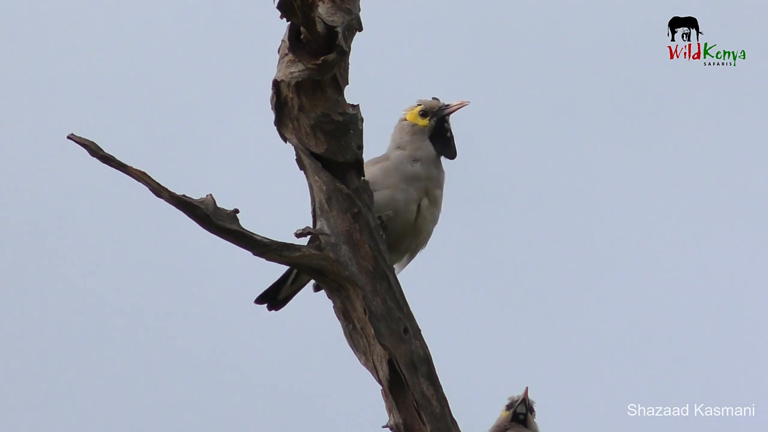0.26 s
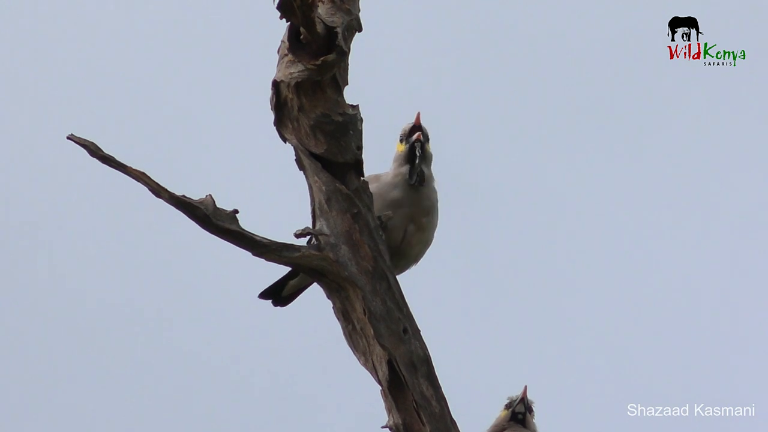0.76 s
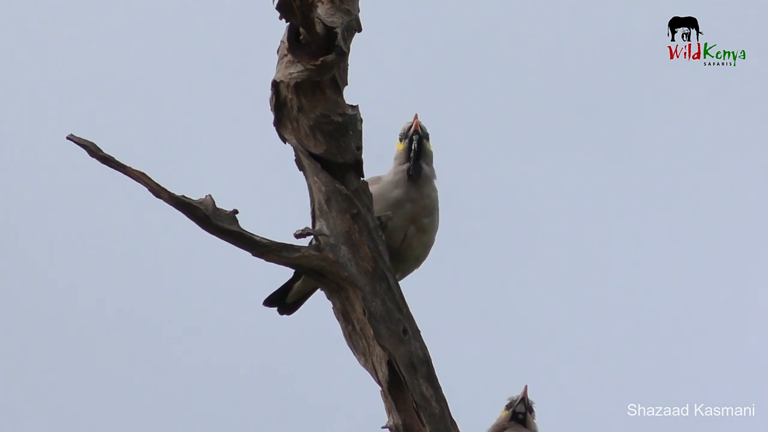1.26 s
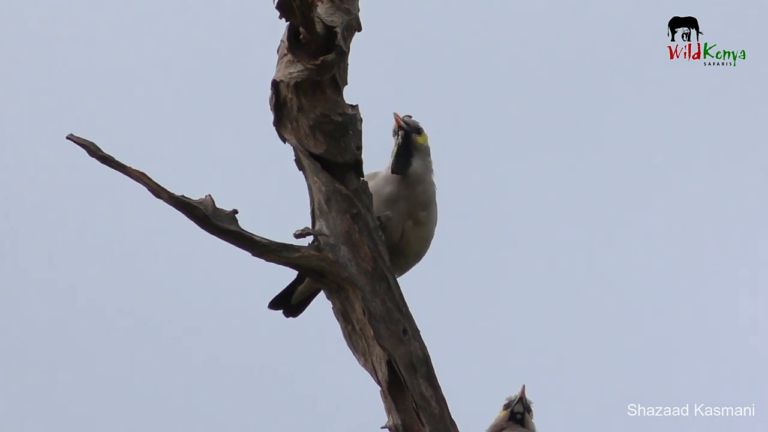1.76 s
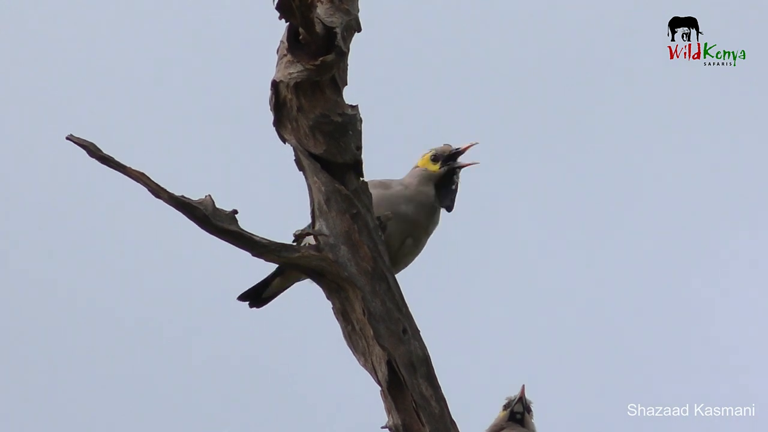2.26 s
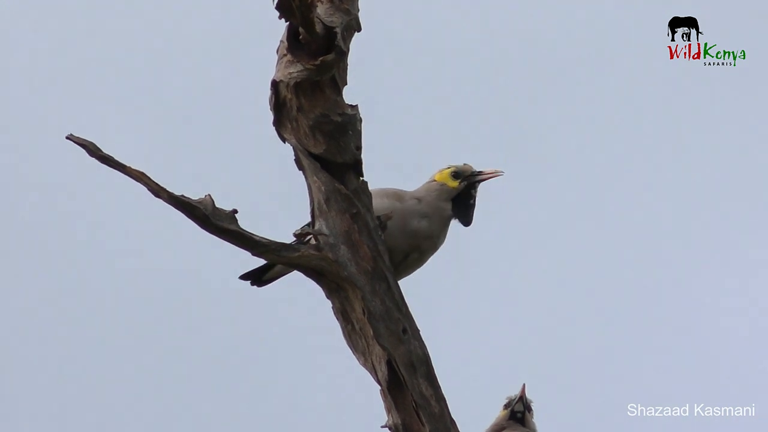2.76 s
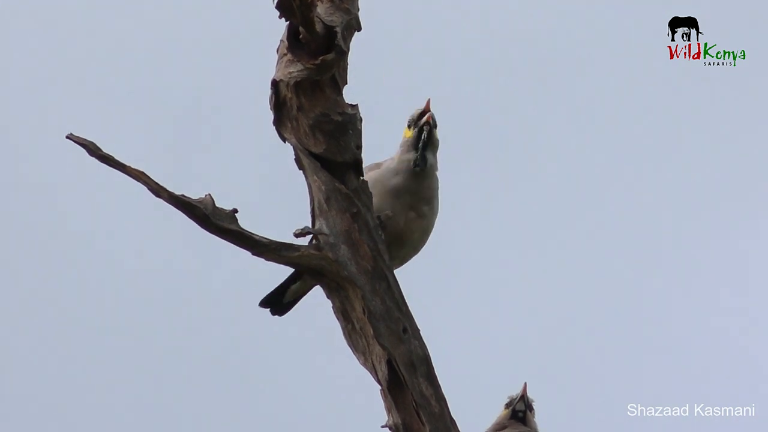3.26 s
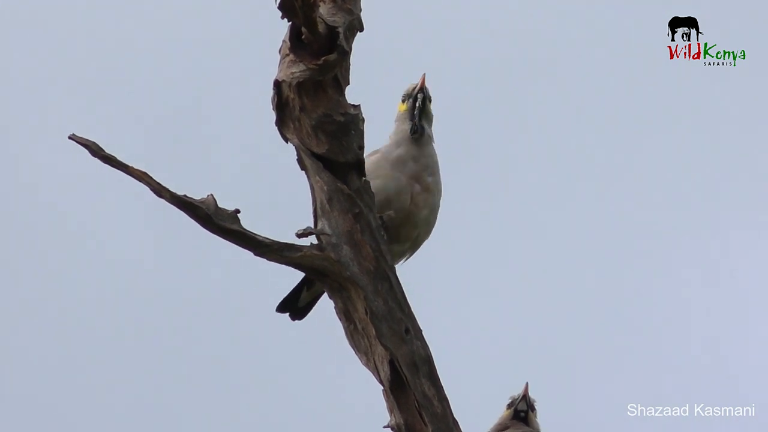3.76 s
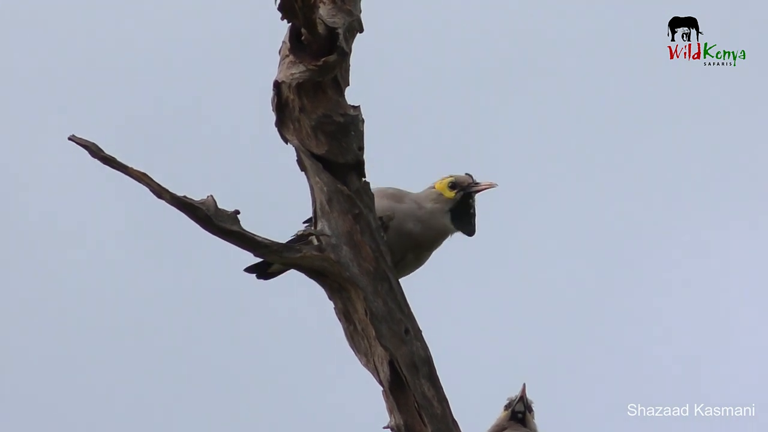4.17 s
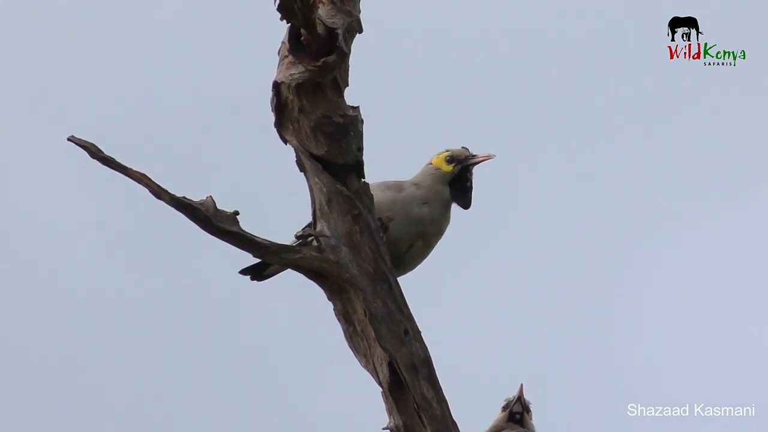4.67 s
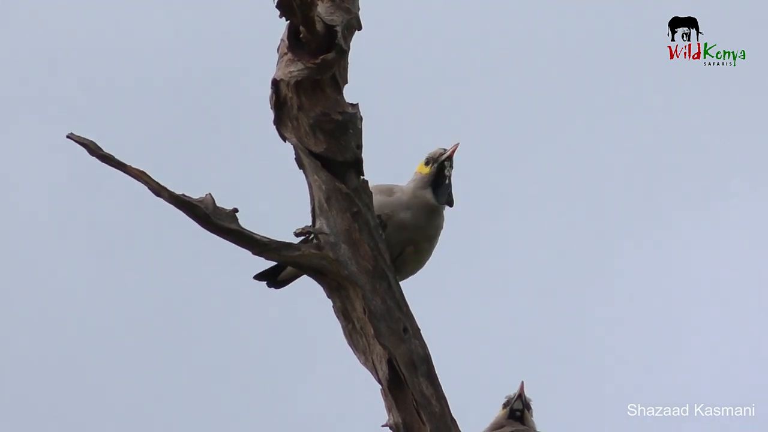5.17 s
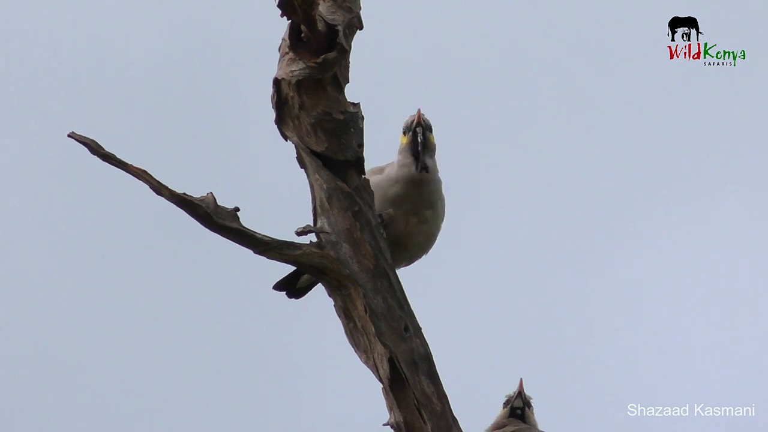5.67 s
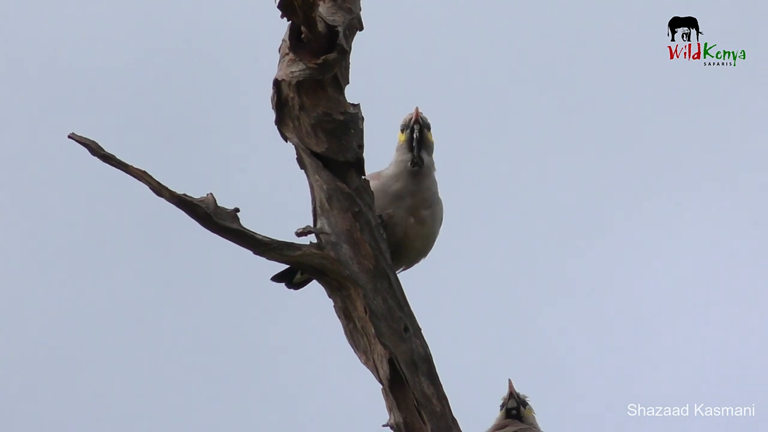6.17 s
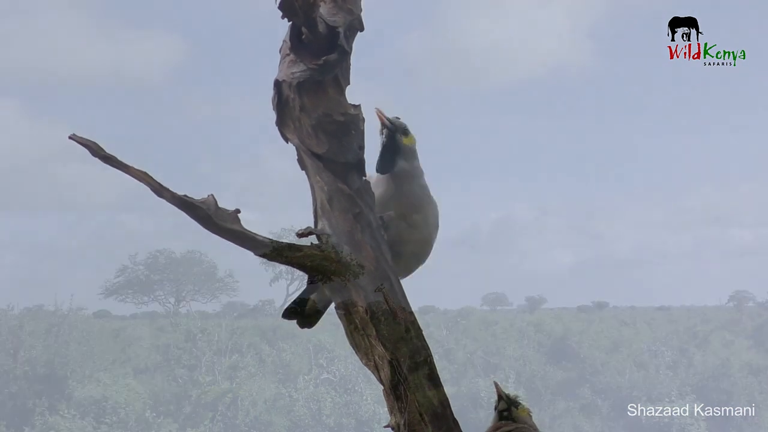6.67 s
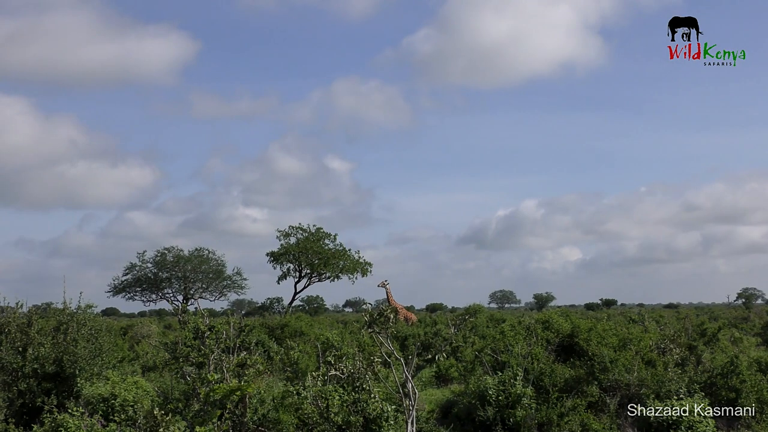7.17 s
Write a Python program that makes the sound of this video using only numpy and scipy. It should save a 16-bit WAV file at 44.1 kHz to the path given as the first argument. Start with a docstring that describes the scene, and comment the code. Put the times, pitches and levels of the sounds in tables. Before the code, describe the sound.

An outdoor flock of starlings is heard through strong, low wind buffeting on a nearly mono microphone. From 0 to 0.7 s there are small chirps over distant chatter and a heavy gust; a small click falls near 0.2. Around 0.8-1.2 s a loud squeak sweeps up and drops, followed by shorter whistles. Fainter notes lead to a piercing rising squeak and rasp at 2.3-2.4, then wavering high whistles until 2.9. The wind eases near 3; abrupt harsh chips and squeaks come at 3.3-3.8. After another lull around 4.2, a sharp cluster of squeaks and rasps runs 4.5-5.1. Wind swells again until about 6.6 with dull ticks and clicks, while thin high squeals fade into sparse calls. Abrupt clicks come around 6.8. From then to 7.4, distant birds weaken, an insect ticks in threes and another rasps in high pulses over faint hiss.

```python
"""Open bush with a flock of starlings: near birds squeak, whistle and rasp, far ones chatter in a haze.
Whistles are sums of gliding harmonics; rasps are puffs of noise through a throat resonance.
Gusty wind, shaped low noise, buffets a nearly mono microphone up to its ceiling; dull ticks fall in the gusts.
Now and then the sound jumps with a click, a step that decays exponentially. Near the end the far calls grow
fainter, an insect ticks in threes and a second one rasps in high, hissing pulses over a faint bright hiss."""
import sys
import numpy as np
from scipy import signal
from scipy.fft import rfft, irfft, next_fast_len
from scipy.io import wavfile
from scipy.ndimage import uniform_filter1d, minimum_filter1d, map_coordinates

SR = 44100
rng = np.random.default_rng(int(sys.argv[2]) if len(sys.argv) > 2 else 0)


def generate_wav(signal):
    """Clip the signal to [-1, 1] and save it as 16-bit WAV at the path in sys.argv[1]."""
    frames = np.transpose(np.atleast_2d(signal))
    scaled = np.clip(frames, -1, 1) * 32767
    pcm = np.round(scaled).astype(np.int16)
    wavfile.write(sys.argv[1], SR, pcm)


N = 326781

# winding calls of the near birds: (second harmonic level/dB, third harmonic level/dB, roughness,
# [(t/s, pitch f/Hz, level/dB)])
NEAR_CALLS = [ (-40, -46, 0.86, [(0.758, 2010, -45.5), (0.852, 2960, -21.5), (.892, 3393, -24),
              (.922, 3650, -23), (0.946, 4060, -27), (0.952, 3844, -22.5), (0.96, 3010, -27.5),
              (1.03, 2247, -33), (1.062, 1920, -46)]), (-34, -47, .7, [(.962, 3210, -31), (.98, 3460, -29),
              (1.015, 3550, -30.5), (1.06, 3620, -51.5), (1.15, 3580, -57), (1.26, 2970, -62)]),
              (-38, -46, 0.77, [(1.088, 2430, -45.5), (1.107, 3045, -31.5), (1.147, 2775, -27.5),
              (1.193, 2465, -36.5), (1.271, 1820, -47)]), (-6, -35, .6, [(1.546, 3490, -55),
              (1.63, 3440, -56)]), (-35.5, -39, 0.65, [(2.275, 2410, -42), (2.305, 2760, -21),
              (2.333, 3385, -17.5), (2.355, 3433, -15), (2.381, 3584, -17.5), (2.393, 3994, -23),
              (2.408, 4100, -21)]), (-36, -44, .6, [(2.408, 5860, -37), (2.418, 5760, -35),
              (2.424, 6530, -41), (2.444, 6500, -39), (2.468, 6660, -55)]),
              (-13, -27, 0.85, [(2.525, 3860, -33), (2.592, 3930, -34), (2.622, 3940, -38.5),
              (2.632, 3430, -34)]), (-33, -42, .8, [(2.65, 2830, -49), (2.698, 2656, -47.5),
              (2.716, 3090, -54), (2.762, 2400, -42), (2.792, 2220, -57)]),
              (-16, -29, 0.97, [(2.727, 3920, -27.5), (2.742, 3947, -28), (2.766, 3750, -37),
              (2.844, 3640, -49), (2.89, 3580, -45)]), (-35, -48.5, 0.67, [(3.564, 2020, -52.5),
              (3.59, 2330, -42.5), (3.61, 2760, -40.5), (3.626, 3690, -40.5), (3.637, 4830, -39),
              (3.657, 4570, -50.5)]), (3, -33, .5, [(3.72, 1835, -51.5), (3.745, 2280, -42),
              (3.759, 2293, -42)]), (-13, -48, 0.64, [(4.61, 2760, -30), (4.62, 2750, -28.5),
              (4.639, 3714, -33.5), (4.663, 3634, -34.5), (4.672, 3100, -36)]),
              (0, -18, .45, [(4.667, 3050, -32.5), (4.683, 2827, -30.5), (4.72, 2880, -34),
              (4.771, 3050, -40), (4.79, 2900, -47)]), (-37.5, -40, .5, [(4.785, 5980, -26.5),
              (4.795, 6780, -38), (4.881, 7560, -42), (4.948, 7850, -43.5), (4.963, 9450, -32),
              (4.98, 9730, -32), (5.004, 9370, -53), (5.014, 9150, -39.5), (5.036, 8980, -40),
              (5.056, 8500, -62)]), (-49, -55, .5, [(4.947, 5680, -36), (4.961, 6440, -37),
              (4.972, 6370, -37), (4.978, 5200, -41), (4.986, 6750, -37), (5.033, 6440, -47)]),
              (-14, -35, 0.53, [(4.982, 2850, -37), (4.994, 2820, -29.5), (5.004, 3430, -27),
              (5.013, 3740, -32), (5.031, 3700, -43), (5.046, 2900, -57)]),
              (-39, -45, .5, [(5.039, 7000, -46), (5.114, 7940, -53), (5.124, 6240, -49), (5.14, 6170, -55),
              (5.19, 7670, -50)]), (-39, -45, 0.57, [(5.182, 6000, -52.5), (5.286, 6680, -45),
              (5.336, 7060, -44.5), (5.342, 6400, -48), (5.382, 6620, -46), (5.39, 7580, -50),
              (5.42, 7430, -46.5), (5.438, 6080, -42), (5.455, 6100, -42), (5.464, 5460, -46),
              (5.47, 7050, -48)]), (-38, -45, .15, [(5.412, 2610, -58), (5.45, 2970, -41),
              (5.475, 3030, -37), (5.503, 2920, -37), (5.509, 3250, -50)]),
              (-38, -44.5, 0.6, [(5.47, 6980, -43), (5.488, 7130, -42), (5.54, 7010, -49),
              (5.608, 7050, -45), (5.63, 8340, -45.5), (5.645, 8030, -48), (5.663, 7070, -44.5),
              (5.69, 7240, -37), (5.698, 7770, -46.5), (5.712, 5230, -46)]),
              (-37, -44, .15, [(5.572, 3100, -53), (5.59, 2927, -40), (5.637, 3110, -36),
              (5.672, 3436, -37), (5.682, 4900, -58), (5.694, 3090, -40), (5.713, 2930, -49)]),
              (-36, -39, .15, [(5.757, 3950, -52), (5.773, 3634, -40.5), (5.83, 3700, -37),
              (5.843, 4090, -53), (5.89, 4120, -55)]), (-39, -42, 1.3, [(5.809, 6300, -58),
              (5.897, 6460, -46), (5.927, 5500, -53), (5.972, 5040, -54)]),
              (-39, -44, 0.55, [(6.613, 6310, -45.5), (6.693, 6740, -42.5), (6.765, 8020, -37.5),
              (6.78, 7790, -50), (6.787, 6800, -42), (6.836, 6540, -54), (6.855, 7400, -66)]), ]
FOURTH_DB = -9.5  # fourth harmonic relative to the third
# short notes that glide to a turn and away: (start t/s, length t/s, first f/Hz, turn f/Hz, last f/Hz,
# turn as a share of the length, level at the turn/dB)
SHORT_NOTES = [ (.006, 0.097, 1945, 1960, 2020, 0, -52.5), (0.088, .072, 2676, 2580, 2170, 0.5, -49.5),
               (0.24, 0.11, 2946, 3008, 2880, 0.7, -38), (.343, 0.041, 3130, 2970, 2290, .35, -38),
               (0.384, 0.034, 1990, 1940, 1780, 0.1, -48), (0.59, 0.062, 3050, 2760, 2420, 0.48, -49.5),
               (.888, 0.07, 2300, 2870, 3000, 0.7, -27), (1.263, 0.028, 2900, 2820, 2770, .5, -46),
               (1.28, 0.088, 1033, 1350, 1620, .6, -55), (1.285, 0.11, 2230, 2860, 1970, 0.37, -33),
               (1.36, 0.025, 3280, 3380, 3350, 0.4, -43), (1.364, .097, 1684, 1684, 1730, 0.03, -48),
               (1.585, 0.29, 8000, 8700, 8230, 0.46, -64.5), (1.626, 0.095, 2990, 2980, 2914, 0.45, -49),
               (1.723, 0.045, 3650, 3570, 3580, 0.97, -49), (1.968, 0.1, 2850, 2784, 2680, 0.5, -53),
               (2.06, 0.041, 3180, 3330, 3540, 0.53, -53), (2.1, 0.1, 700, 766, 710, 0.5, -47.5),
               (2.102, 0.035, 2690, 2600, 2310, 0.05, -47), (2.198, 0.12, 927, 1003, 942, 0.49, -48),
               (2.352, 0.27, 620, 623, 620, 0, -57), (2.458, 0.085, 8200, 8700, 8200, 0.3, -60),
               (2.466, 0.042, 2700, 2680, 2530, 0.1, -48), (2.537, 0.026, 3700, 3400, 2070, .2, -41),
               (2.677, 0.048, 3550, 3570, 3920, .15, -45), (2.908, 0.092, 2550, 2710, 2400, 0.47, -50),
               (3.462, 0.0504, 2253, 2117, 1914, 0.41, -25), (3.52, .046, 3360, 3580, 3580, .8, -50),
               (3.607, 0.064, 1284, 1108, 1030, 0.73, -47.5), (3.743, .05, 1170, 1164, 1050, 0.6, -45.5),
               (3.899, .068, 2175, 2270, 2020, .68, -37), (3.935, 0.07, 3070, 3270, 2840, 0.52, -51),
               (3.959, 0.24, 1020, 1295, 1300, .85, -52), (4.3, 0.09, 2920, 3650, 3840, .7, -51.5),
               (4.341, 0.16, 8800, 9050, 8950, 0.5, -59), (1.358, 0.076, 8600, 7730, 7650, 0.46, -64),
               (1.779, 0.033, 3070, 3700, 4100, 0.3, -53), (4.401, 0.035, 3110, 2700, 1800, 0.53, -39),
               (4.536, 0.11, 6440, 7080, 6950, 0.85, -43), (4.633, 0.049, 8720, 9140, 9500, 0.53, -23),
               (4.748, 0.03, 3850, 3800, 3690, 0.2, -39), (4.785, 0.092, 3260, 3340, 3450, 0.4, -49.5),
               (4.877, 0.096, 4020, 4260, 4020, .85, -46), (5.369, 0.062, 2000, 2035, 2120, 0.1, -52),
               (5.692, .042, 6340, 6380, 6590, 0.3, -42), (5.709, 0.11, 5160, 4920, 5370, 0.35, -48),
               (5.749, 0.11, 2000, 2130, 2300, .4, -51), (5.985, 0.075, 5940, 5720, 5500, .4, -51.5),
               (6.048, 0.081, 5570, 5530, 6300, .4, -52), (5.845, 0.079, 8500, 8500, 8450, .5, -71),
               (6.192, 0.082, 3250, 3660, 3750, 0.3, -55), (6.449, .048, 2370, 2400, 2500, 0.4, -47.5),
               (6.877, .035, 3100, 2740, 2050, .5, -61), (0.958, 0.093, 3050, 3000, 2950, .6, -35),
               (.952, 0.078, 4000, 3870, 4050, 0.16, -39), (2.219, .08, 4000, 4220, 5000, .6, -46),
               (2.402, .06, 2900, 2800, 2720, .4, -40), (2.33, .06, 11100, 11200, 11400, .5, -70),
               (3.329, .045, 3950, 4080, 3900, .5, -30.5), (3.344, .02, 5700, 5670, 5650, .5, -46),
               (3.415, .045, 2300, 2250, 2050, .3, -46), (3.4, 0.051, 1500, 1503, 1450, 0.3, -48.5),
               (3.469, .02, 3500, 3340, 3200, 0.4, -40), (3.503, .085, 1900, 1650, 1420, .6, -58),
               (3.612, .06, 2400, 2460, 2380, 0.7, -47.5), (3.757, .014, 3250, 2950, 2600, .4, -33.5),
               (3.76, .02, 4400, 4110, 3700, .3, -37), (3.757, 0.028, 2300, 2300, 2280, 0.4, -41),
               (4.79, 0.18, 10500, 11500, 11500, .6, -72.5), (4.9, 0.04, 6350, 6300, 6200, 0.4, -54),
               (4.524, 0.029, 8000, 8750, 9600, .7, -53), (5.316, .045, 2650, 3100, 3550, .5, -54),
               (5.381, 0.039, 4350, 4420, 4450, .6, -63), (5.43, 0.065, 1500, 1750, 2350, .4, -60),
               (5.6, .07, 3300, 3500, 3740, 0.6, -56), (5.888, 0.064, 3700, 3700, 3670, 0.5, -57),
               (4.575, .05, 4800, 5280, 5880, 0.5, -49), (5.032, .02, 5500, 5420, 5410, .4, -45),
               (6.37, 0.14, 3850, 3850, 3700, .2, -58), (6.946, 0.091, 3140, 3030, 3180, 0.17, -57), ]
HUSH_DB, RISE, FALL = -63.5, 0.53, 0.61  # a note starts and ends these shares of the way to the hush
# one bird's falling chip: (start t/s, level/dB)
CHIP_TIMES = [(.322, -60), (.472, -65), (2.022, -61), (2.85, -57), (2.975, -60), (3.2, -57), (0.957, -42),
              (1.226, -50.5), (1.374, -53), (4.155, -44), (4.198, -44.5), (4.29, -43), (4.435, -48.5),
              (7.358, -54.5)]
# shape of that chip: (length t/s, first f/Hz, turn f/Hz, last f/Hz, turn as a share of the length)
CHIP_SHAPE = (.031, 6100, 5750, 5200, 0.39)
# far beaded notes: (start t/s, length t/s, first f/Hz, turn f/Hz, last f/Hz, turn as a share of the length,
# level/dB, bead rate f/Hz)
BEADED_NOTES = [(1.551, .55, 1610, 1300, 1132, .5, -50.5, 23.5),
                (4.578, 0.28, 1910, 1893, 1865, 0.48, -44.5, 29)]
# harsh calls: (start t/s, length t/s, rise as a share of the length, throat f/Hz,
# width of each resonance f/Hz, level/dB)
HARSH_CALLS = [(.62, 0.27, 0.1, 2800, 4900, -47.5), (0.65, 0.26, 0.5, 4520, 970, -46.5),
               (0.66, 0.2, 0.6, 6100, 640, -54), (.87, 0.087, .4, 6300, 900, -52),
               (4.62, 0.16, 0.2, 11300, 3000, -59), (4.96, 0.096, .3, 11300, 3000, -57),
               (4.635, .13, .2, 9200, 750, -49), (1.1, 0.056, 0.9, 2860, 1100, -45.5),
               (2.165, 0.18, 0.17, 4700, 4100, -46.5), (2.383, 0.034, 0.63, 3800, 750, -21.5),
               (2.393, 0.035, 0.1, 8800, 3400, -44), (2.5, 0.32, 0.7, 6900, 2800, -53.5),
               (3.325, 0.035, 0.17, 3980, 1700, -28), (3.325, .045, .1, 8700, 2500, -47),
               (3.398, 0.065, 0.3, 3900, 840, -41), (3.4, 0.13, 0.87, 2300, 2000, -40.5),
               (3.27, 0.048, 0.52, 2000, 3200, -48), (3.76, 0.045, 0.17, 3060, 2100, -36.5),
               (3.93, 0.16, 0, 2660, 1000, -49.5), (4.547, 0.029, 0, 3700, 3100, -35.5),
               (4.57, 0.16, 0.2, 3200, 2300, -42.5), (4.98, 0.07, .05, 5500, 2700, -39),
               (1.1, 0.079, 0, 2700, 250, -41), (5.75, 0.084, 0.5, 2100, 540, -51.5),
               (5.12, 0.077, 0.4, 5500, 2700, -49.5), (5.692, 0.036, 0.4, 5400, 3900, -37),
               (6.358, 0.15, 0.25, 1950, 3200, -51), (5.338, 0.048, .3, 2800, 1700, -51),
               (2.44, 0.24, 0.1, 3500, 2000, -46), (2.203, 0.17, 0.16, 2100, 1800, -45),
               (7.153, 0.029, 0.1, 2100, 2400, -38.5)]
# course of the wind: (t/s, buffet level/dB, flutter level/dB)
WIND_COURSE = [(0.0, -12.5, -28.5), (0.17, -5, -15.5), (0.53, -9, -32), (0.74, -2, -16.5),
               (1.019, -8, -27.5), (1.39, -4.5, -17.5), (1.92, -5, -19.5), (2.28, -11.5, -35),
               (2.85, -11.5, -42), (3.06, -21.5, -62), (3.2, -11, -43.5), (3.63, -5, -22.5),
               (3.93, -9.5, -35), (4.05, -21, -55), (4.21, -24, -68), (4.5, -11.5, -31), (4.82, -8.5, -40),
               (4.89, -9, -24), (4.99, -3.5, -9.5), (5.19, -3, -22.5), (5.54, -2, -15.5),
               (6.0, -7.5, -25.5), (6.17, -6.5, -20), (6.66, -7.5, -31), (7.19, -16, -27.5),
               (7.41, -18, -55)]
# relative spectral density of the large eddies: (f/Hz, level/dB)
BUFFET_SPECTRUM = [(3, -24.5), (8, 8), (20, -4), (35, -5.5), (60, -20.5), (100, -39.5), (300, -100)]
# relative spectral density of the small eddies: (f/Hz, level/dB)
FLUTTER_SPECTRUM = [(25, -49), (55, -2), (95, -11), (132, -21), (271, -43.5), (400, -58), (800, -99.5)]
# dull ticks in the gusts: (t/s, level before the window/dB)
GUST_TICKS = [(5.071, -43), (5.17, -34), (5.645, -38), (6.155, -40), (6.234, -37.5)]
# sudden steps of the signal: (t/s, step in linear amplitude)
SIGNAL_STEPS = [(0.1635, 0.06), (3.372, 0.048), (5.6227, 0.09), (5.829, -0.043), (6.788, 0.11),
                (6.8296, -0.28), (6.8713, .11)]
# relative spectral density of the second insect's rasp and the hiss under it: (f/Hz, level/dB)
HIGH_RASP_SPECTRUM = [(2000, -28), (6000, -20), (9000, -6.5), (13000, -1), (15500, -5.5)]
# relative spectral density of far birds and leaves: (f/Hz, level/dB)
HAZE_SPECTRUM = [(120, 1.5), (300, -2.5), (500, -2.5), (1600, -7.5), (3200, -7), (4850, -14.5), (6000, -16),
                 (6900, -20), (8600, -25.5), (9500, -36.5), (10200, -43), (15500, -65)]
# course of the far haze: (t/s, level/dB)
HAZE_COURSE = [(0, -55.5), (.6, -50.5), (1.2, -54), (1.7, -53.5), (2.25, -49), (2.7, -50.5), (3.451, -47),
               (3.75, -52.5), (4.4, -50.5), (4.8, -48), (5.1, -55.5), (5.901, -52), (6.25, -59), (6.6, -52),
               (7.41, -54)]
TOP_HZ = 15800  # band limit


def amp(db):
    """Decibels: twenty of them make a tenfold amplitude."""
    return 10 ** (np.asarray(db) / 20)


def unit(x):
    """Normalisation: x at rms 1."""
    return x / np.sqrt(np.mean(x ** 2) + 1e-20)


def wobble(rate, size=N):
    """Random modulation: a smooth curve through Gaussian knots, rate knots a second."""
    knots = rng.standard_normal(int(size / SR * rate) + 4)
    return map_coordinates(knots, [np.arange(size) * rate / SR])


def filtered(x, response):
    """Linear filtering: the spectrum of x times a complex response of frequency."""
    size = next_fast_len(x.shape[-1] + 8192)
    spectrum = rfft(x, size) * response(np.fft.rfftfreq(size, 1 / SR))
    return irfft(spectrum, size)[..., :x.shape[-1]]


def rush(spectrum, side_db, patchy_db):
    """Coloured noise of rms 1: mid and weak side channels, with gain patchy in time and frequency."""
    bins = signal.stft(rng.standard_normal((2, N)), nperseg=512)[2]
    patches = uniform_filter1d(rng.standard_normal(bins.shape[1:]), size=5, axis=0)
    patches = unit(uniform_filter1d(patches, size=9, axis=1))
    pair = signal.istft(bins * amp(patchy_db * patches), nperseg=512)[1][:, :N]
    f, db = np.transpose(spectrum)
    mid, side = filtered(pair, lambda hz: amp(np.interp(np.log(hz + 1), np.log(f + 1), db)))
    side = amp(side_db) * side
    return unit(np.array([mid + side, mid - side]))


def add(track, s, sound):
    """Superposition: mixes sound into track at s seconds."""
    part = track[max(round(s * SR), 0):][:len(sound)]
    part += sound[:len(part)]


def singers():
    """Superposition of harmonic voices: the birds that can be told apart."""
    out = np.zeros(N)
    for second_db, third_db, rough, rows in NEAR_CALLS:
        add(out, rows[0][0], note(rows, [second_db, third_db, third_db + FOURTH_DB], rough))
    chips = [(s, *CHIP_SHAPE, db) for s, db in CHIP_TIMES]
    for row in SHORT_NOTES + chips:
        rough = max(.6, -.07 * (row[-1] + 29))  # faint notes are far and blurred
        add(out, row[0], note(glide(*row), [-38, -44], rough=rough))
    for *row, rate in BEADED_NOTES:
        add(out, row[0], note(glide(*row), [-30], pulse_hz=rate))
    return out


def note(rows, overtones_db, rough=0.65, pulse_hz=0):
    """Modulated harmonics: the syrinx sings a wavering, soft-ended tone; pulse_hz chops it into a trill."""
    s, hz, db = np.transpose(rows)
    t = np.arange(s[0], s[-1], 1 / SR)
    level_db = np.interp(t, s, db)
    pitch = uniform_filter1d(np.interp(t, s, hz), size=180)
    # high, loud singing is less steady
    strain = np.minimum(pitch / 4000, 1.9) ** 1.7 * amp(0.31 * (level_db + 46.0))
    pitch = pitch + 22 * rough * strain * wobble(330, size=len(t))
    # each low bead of a trill drops steeply
    bead = (pulse_hz * t + .5) % 1 - .5
    pitch = pitch * (1 - .35 * bead * (pulse_hz > 0) * (pitch < 1750))
    phase = 2 * np.pi * np.cumsum(pitch) / SR

    breath = rough * wobble(800, size=len(t))
    fundamental = (1 + .12 * rough * breath) * np.sin(phase)
    overtones = np.zeros(len(t))
    for k, gain_db in enumerate(overtones_db, start=2):
        audible = pitch * k < SR / 2  # no aliasing
        overtones += amp(gain_db) * np.sin(k * phase) * audible
    tone = fundamental + (1 + .6 * breath) * overtones

    ends = np.clip(np.minimum(t - s[0], s[-1] - t) / .0018, 0, 1)
    # the tone throbs and now and then nearly breaks
    throb_depth = rough * (0.31 + 0.15 * np.minimum(strain, 1.5))
    throb = np.abs(1 + throb_depth * wobble(189.6, size=len(t)))
    bead_gain = amp(3 * (pulse_hz > 0) * wobble(30.8, size=len(t)))
    chop = np.cos(np.pi * pulse_hz * t) ** 4 * bead_gain
    return np.sqrt(2) * amp(level_db) * throb * ends * chop * tone


def glide(start, length, first_hz, turn_hz, last_hz, share, db):
    """Piecewise-linear glide: pitch and level rows run from near the hush to the turn and back."""
    depth = HUSH_DB - db
    turn = start + length * np.clip(share, .05, .95)
    return [(start, first_hz, db + RISE * depth),
            (turn, turn_hz, db),
            (start + length, last_hz, db + FALL * depth)]


def rasps():
    """Source and filter: uneven puffs of breath noise ring a wide throat resonance, weak in the top octave."""
    out = np.zeros(N)
    for s, length, rise, hz, width_hz, db in HARSH_CALLS:
        u = np.arange(round(length * SR)) / (length * SR)
        puffs = amp(1.7 * wobble(390, size=len(u)))  # a few ms apart
        air = puffs * rng.standard_normal(len(u))

        def throat(f):
            """Two cascaded band-pass resonances and a treble roll-off."""
            resonance = 1j * f * width_hz / (hz * hz - f * f + 1j * f * width_hz)
            return resonance ** 2 / (1 + (f / 8800) ** 8)

        rise = np.clip(rise, .02, .9)
        swell = np.minimum(u / rise, (1 - u) / (1 - rise)) ** 0.59
        add(out, s, amp(db) * swell * unit(filtered(air, throat)))
    return out


def far_flock(count=460):
    """Random superposition: faint short glides, half near 3 kHz, the rest near 6 and 9; fainter at the end."""
    out = np.zeros(N)
    for when, kind, pitch, slope, length, loud in rng.random((count, 6)):
        voice = int(kind * 4)
        centre_hz = (2606, 3390, 5870, 8850)[voice]
        spread = (0.45, 0.39, 0.054, 0.11)[voice]
        hz = centre_hz * (1 + spread * (pitch - .5))
        db = (-67, -67, -71, -77)[voice] + 11 * loud ** 3  # few are loud
        end = .02 + .06 * length ** 2
        rows = [(0, hz * (1.08 - .1 * slope), db - 2.5),
                (end / 2, hz, db + 2.5),
                (end, hz * (.88 + 0.16 * slope), db - 3)]
        s = when * N / SR
        add(out, s, amp(-5 * (s > 6.7)) * note(rows, [-30], rough=1.92))
    return out


def scatter(x, t60=0.13):
    """Diffuse reflection: branches and ground return a short decaying tail, a little different on each side."""
    t = np.arange(SR // 4) / SR
    mid, side = rng.standard_normal((2, len(t))) * amp(-60 * t / t60)
    tail = np.array([mid + .04 * side, mid - .04 * side]) / np.linalg.norm(mid)
    delayed = np.pad(x, (200, 0))[None]  # samples
    return signal.fftconvolve(delayed, tail, axes=1)[:, :N]


def wind():
    """Turbulent pressure: large slow eddies thump the capsule, smaller ones flutter on top in quick lumps."""
    s, buffet_db, flutter_db = np.transpose(WIND_COURSE)
    t = np.arange(N) / SR
    lumps_db = 0.74 * wobble(7.7)
    buffet = unit(amp(1.3 * lumps_db) * rush(BUFFET_SPECTRUM, side_db=-40.0, patchy_db=-1.34))
    flutter = unit(amp(lumps_db) * rush(FLUTTER_SPECTRUM, side_db=-36.0, patchy_db=4.5))
    return amp(np.interp(t, s, buffet_db)) * buffet + amp(np.interp(t, s, flutter_db)) * flutter


def ticks():
    """Windowed low-pass noise: a few ms of dull crackle."""
    out = np.zeros(N)
    size = SR // 120
    for s, db in GUST_TICKS:
        dull = unit(filtered(rng.standard_normal(size), lambda hz: 1 / (1 + (hz / 1300) ** 3)))
        add(out, s, amp(db) * np.hanning(size) ** 2 * dull)
    return out


def jumps(settle=.012):
    """Exponential relaxation: each step is sudden and sinks back with time constant settle, in seconds."""
    out = np.zeros(N)
    t = np.arange(SR // 8) / SR
    for s, step in SIGNAL_STEPS:
        add(out, s, step * np.exp(-t / settle))
    return out


def ticking_insect():
    """Impulse excitation: clicks in groups of three ring a wing resonance near the end."""
    clicks = np.zeros(N)
    groups = np.arange(6.905, N / SR - .03, .0645)
    jitter = 0.0016 * rng.standard_normal((len(groups), 3))
    times = groups[:, None] + .0085 * np.arange(3) + jitter
    clicks[np.round(times * SR).astype(int)] = amp(-26.5 + 2.7 * rng.standard_normal(times.shape))
    return filtered(clicks, lambda hz: (1j * hz * 1900 / (6300 ** 2 - hz * hz + 1j * hz * 1900)) ** 4)


def high_insect(start=6.62, fade=.25):
    """Amplitude-modulated noise: a second insect rasps in pulses over a faint bright hiss, fading in."""
    t = np.arange(N) / SR
    opening = np.clip((t - start) / fade, 0, 1)
    pulses = amp(8.8 * np.cos(np.pi * 13.2 * (t - 7.225)) ** 6)  # 13.2 a second
    return amp(-75.0) * opening * pulses * rush(HIGH_RASP_SPECTRUM, side_db=-38.0, patchy_db=1.0)


def far_haze():
    """Incoherent sum: far birds and leaves merge into coloured noise whose level flickers."""
    level_db = np.interp(np.arange(N) / SR, *np.transpose(HAZE_COURSE))
    flicker_db = 1.5 * wobble(16)
    return amp(level_db + flicker_db) * rush(HAZE_SPECTRUM, side_db=-30.5, patchy_db=4.5)


def scene():
    """Superposition of birds, their echo, wind, ticks, two insects and haze."""
    birds = singers() + rasps() + far_flock()
    echo = amp(-12) * scatter(birds)
    gusts = amp([[-.12], [.12]]) * wind()  # a touch louder on the right
    return birds + echo + gusts + ticks() + ticking_insect() + high_insect() + far_haze()


def record(dry):
    """Gain reduction: a quick limiter holds the gusts under the ceiling; the band limit then cuts the top."""
    dry = dry + jumps()
    need = np.minimum(1, 0.973 / (np.abs(dry).max(axis=0) + 1e-9))
    gain = minimum_filter1d(need, size=700)
    gain = uniform_filter1d(uniform_filter1d(gain, size=350), size=350)
    return filtered(dry * gain, lambda hz: hz < TOP_HZ)


dry = scene()
out = record(dry)
generate_wav(out)
```